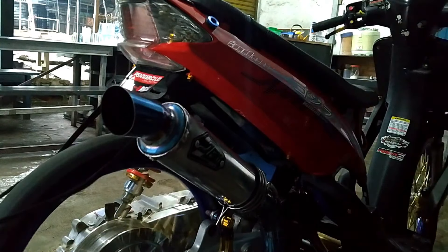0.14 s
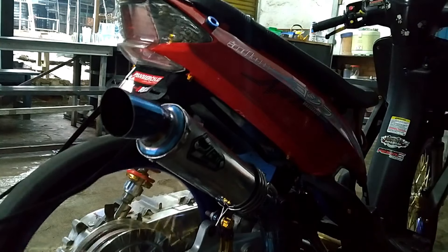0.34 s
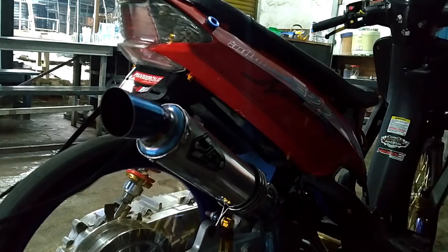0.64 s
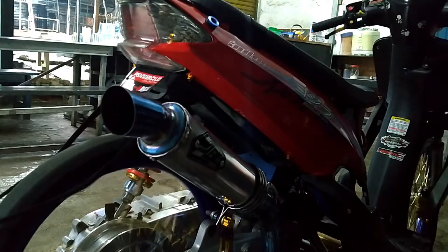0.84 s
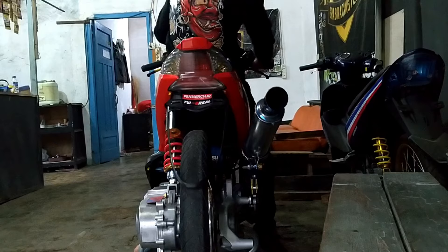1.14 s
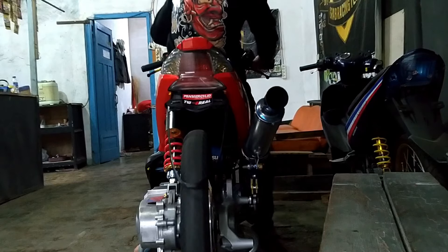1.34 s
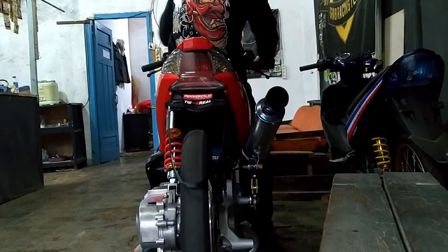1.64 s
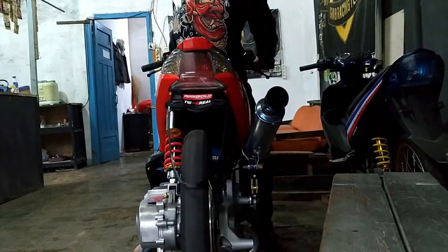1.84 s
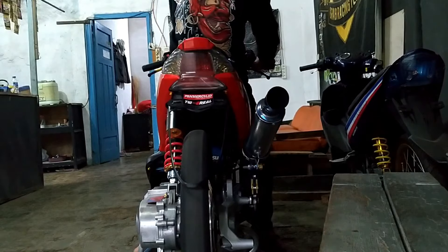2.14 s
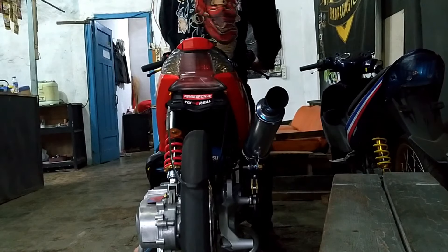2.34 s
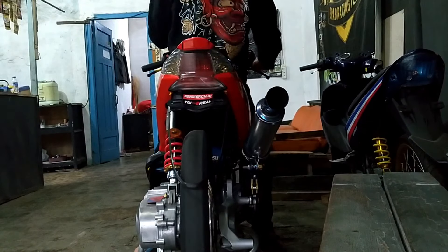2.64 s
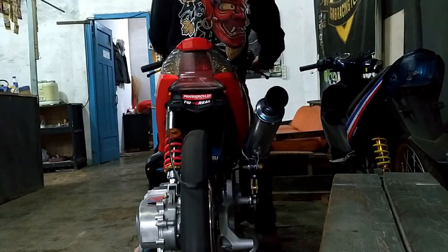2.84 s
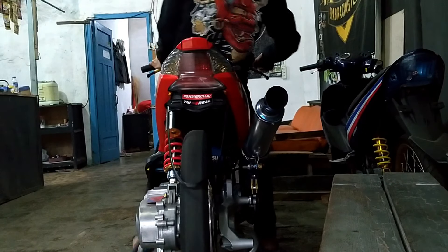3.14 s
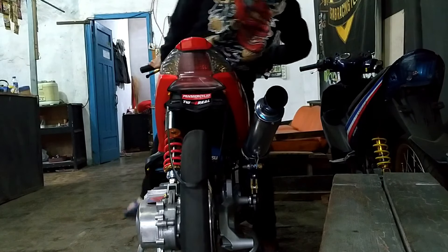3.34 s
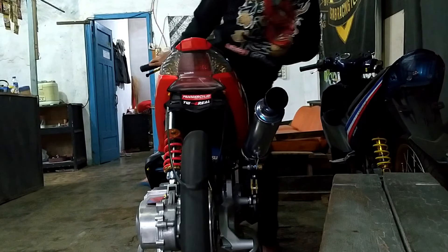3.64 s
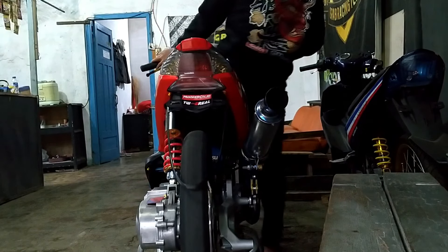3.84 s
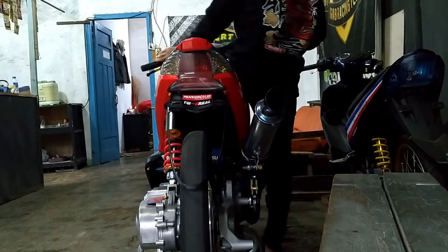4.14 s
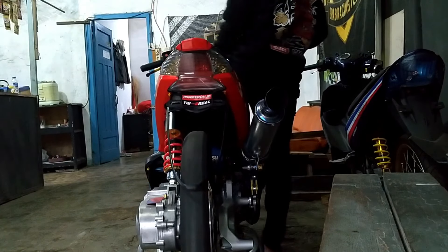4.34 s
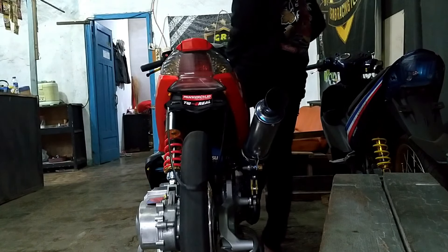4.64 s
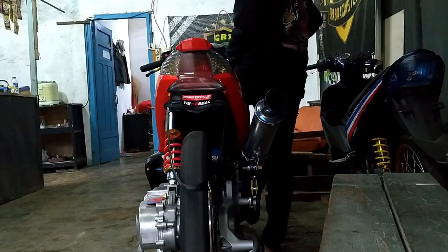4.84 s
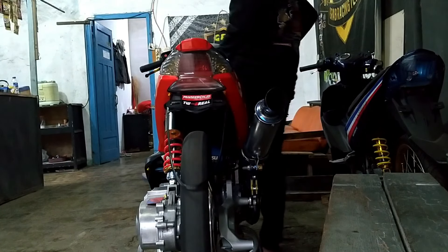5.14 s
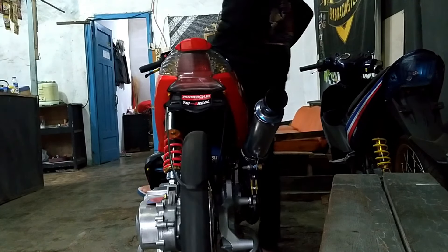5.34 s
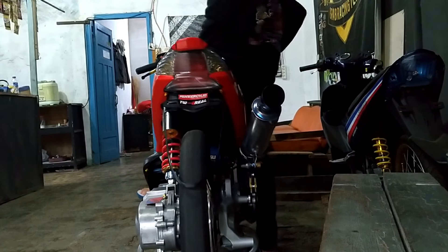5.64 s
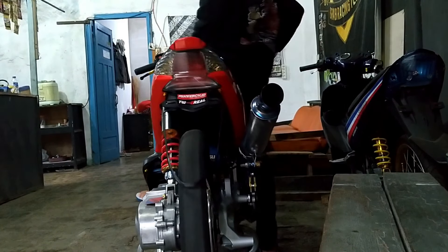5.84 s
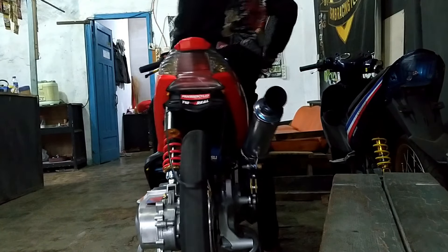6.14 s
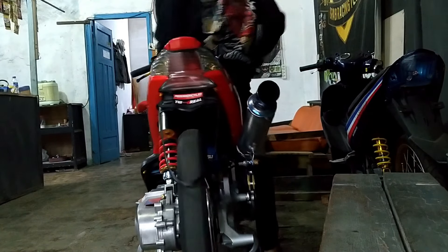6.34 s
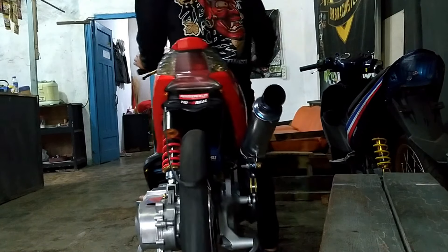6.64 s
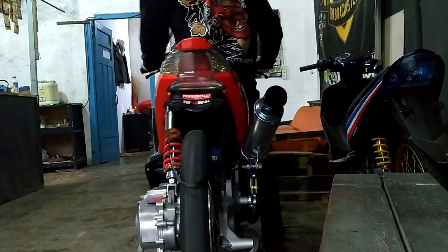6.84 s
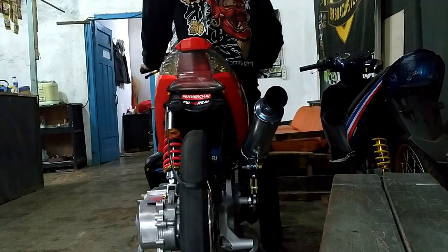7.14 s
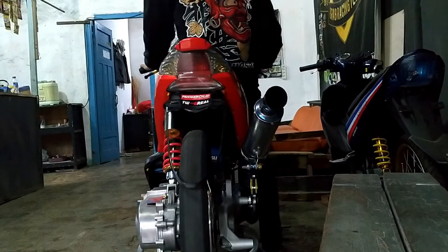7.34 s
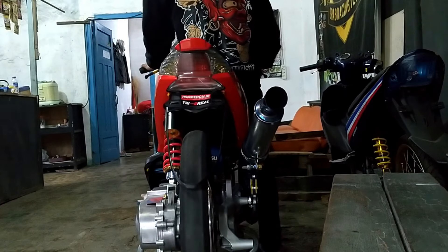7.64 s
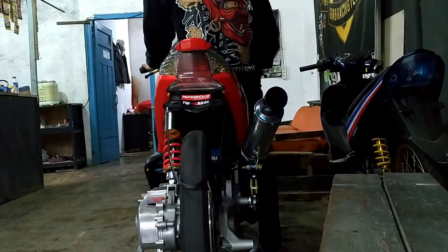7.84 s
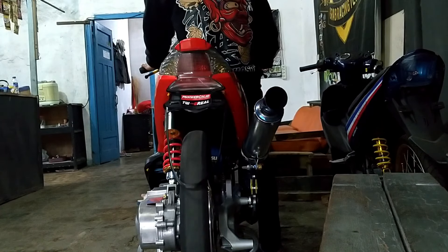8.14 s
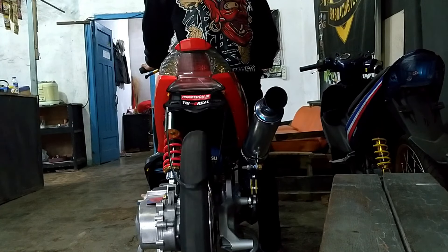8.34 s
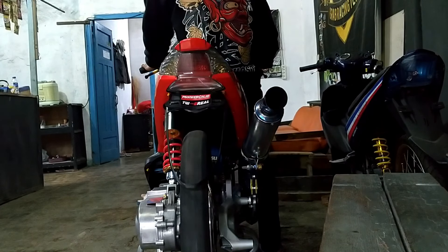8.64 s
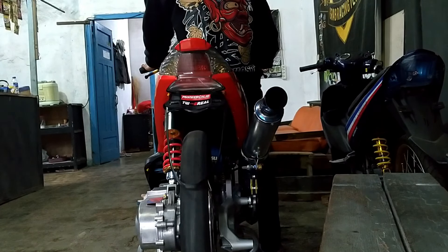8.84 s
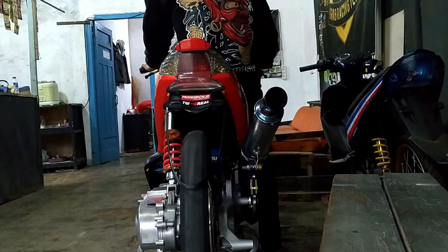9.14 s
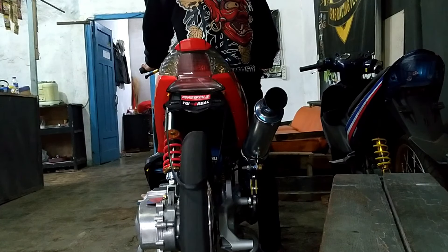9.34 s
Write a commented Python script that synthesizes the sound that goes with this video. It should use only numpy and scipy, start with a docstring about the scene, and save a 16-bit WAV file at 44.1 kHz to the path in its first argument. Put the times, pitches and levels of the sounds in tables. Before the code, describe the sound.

A single-cylinder motorcycle revs with sharp exhaust pops, then settles into a long, lumpy idle before starting to rev again.

```python
"""In a small workshop a single-cylinder motorcycle runs with an open silencer.
It is heard at the pipe mouth for one rev, then from behind the bike: a blip, a long lumpy idle with pops
and misfires, and the start of another rev. Firing pulses excite resonances of pipe and room; gas jets are
noise gated by the flow; valves, drive and steel shell add ticks, rattle and pings. A limiter ducks peaks."""
import sys
import numpy as np
from scipy import signal
from scipy.fft import rfft, irfft, next_fast_len
from scipy.io import wavfile
from scipy.ndimage import uniform_filter1d, minimum_filter1d, map_coordinates

SR = 44100
rng = np.random.default_rng(int(sys.argv[2]) if len(sys.argv) > 2 else 0)


def inscribe(sig):
    """Save sig as 16-bit PCM at rate SR to the path in sys.argv[1].

    A 1-D sig is mono; a 2-D sig holds one channel per row.
    Samples are clipped to [-1, 1] before scaling.
    """
    pcm = np.round(np.clip(np.atleast_2d(sig).T, -1, 1) * 32767)
    wavfile.write(sys.argv[1], SR, pcm.astype(np.int16))


N = 418068

MOVE_S = 1.08  # the listening place changes from the pipe mouth to behind the bike
IDLE_RATE = 15.2  # firings per s


def amp(db):
    """Decibel law: level to amplitude gain."""
    return 10 ** (np.asarray(db) / 20)


def unit(x):
    """Normalization: x at rms 1."""
    return x / np.sqrt(np.mean(x ** 2) + 1e-20)


def along(points, hz):
    """Logarithmic frequency scale: interpolates (Hz, value) points."""
    f, v = np.transpose(points)
    return np.interp(np.log(hz + 1), np.log(f + 1), v)


def curves(rows):
    """Linear interpolation in time: one value per sample for each column after the time."""
    s, *cols = np.transpose(rows)
    return [np.interp(np.arange(N) / SR, s, c) for c in cols]


def filtered(x, response):
    """Linear filtering: the spectrum of x times a complex response of frequency."""
    m = next_fast_len(N + SR // 2)
    return irfft(rfft(x, m) * response(np.fft.rfftfreq(m, 1 / SR)), m)[:N]


def coloured(x, spectrum):
    """Spectral shaping: x weighted by (Hz, dB) points."""
    return filtered(x, lambda hz: amp(along(spectrum, hz)))


def ring(x, modes):
    """Modal superposition: parallel resonances of alternating sign, with skirts below and above them."""
    edges = [modes[0][0] * 0.96, modes[-1][0] * 1.47]
    x = signal.sosfilt(signal.butter(2, edges, "band", fs=SR, output="sos"), x)

    def response(f):
        total = 0
        for k, (centre, width, db) in enumerate(modes):
            resonance = 1j * f * width / (centre * centre - f * f + 1j * f * width)
            total = total + (-1) ** k * amp(db) * resonance
        return total

    return filtered(x, response)


def gliding(x, modes, ratio):
    """Time warping: resonances whose frequencies are scaled by a curve (ratio up to 1)."""
    n, clock = np.arange(N), np.cumsum(ratio)
    warped = np.interp(n, clock, x)
    return np.interp(clock, n, ring(warped, modes))


def steady(x, size):
    """Level equalization: divides x by its running rms over about size samples."""
    power = np.abs(uniform_filter1d(uniform_filter1d(x ** 2, size), size))
    return x / np.sqrt(power + 1e-4 * np.mean(x ** 2))


def fade(pulses, life):
    """Exponential decay: each pulse dies away with a time constant of life seconds."""
    return signal.lfilter([1], [1, -np.exp(-1 / (life * SR))], pulses)


# Twists of the throttle. Each row: start of opening in seconds, time to open in seconds,
# start of shutting in seconds, opening from 0 to 1.
TWISTS = [(.025, 0.02, 0.19, 0.16), (0.326, 0.012, 0.67, 0.8), (1.161, 0.074, 1.38, 0.79),
          (9.05, 0.58, 9.7, 0.5)]
RELEASE_S = 0.031  # time constant of the flow after the throttle shuts


def throttle():
    """Flow control: each twist opens the gas flow, holds it and lets it decay exponentially."""
    t = np.arange(N) / SR
    gas = 0
    for opens, rise, shuts, opening in TWISTS:
        gas = gas + opening * np.clip((t - opens) / rise, 0, 1) * np.exp(-np.maximum(t - shuts, 0) / RELEASE_S)
    return gas


def turning(speed):
    """Phase is the integral of frequency: engine cycles done so far."""
    return np.cumsum(curves(speed)[0]) / SR


def loudness(law, speed, base_speed):
    """Power law of source strength: each exhaust layer's dB follows engine speed and throttle."""
    doublings, gas = np.log2(curves(speed)[0] / base_speed), throttle()
    return [db + speed_db * doublings + gas_db * gas for db, speed_db, gas_db in law]


# Misfires, the gaps in the lumpy idle.
# Each row: time in seconds, change in dB of any firing within 0.025 s.
MISFIRES = [(1.915, -7.5), (2.024, -1.5), (2.134, 1), (2.265, -3), (2.392, -4), (2.523, -4), (2.919, -1.5),
            (3.308, -6), (3.429, -4), (3.559, -3.5), (4.004, -1.5), (4.539, -2), (4.672, 1), (5.264, -0.5),
            (5.523, -1), (6.705, -1), (8.562, -2), (8.758, -0.5), (8.96, -6), (9.091, -2.5)]


def firings(cycles, scatter_db, jitter, hard_db):
    """Periodic impulsive source: a pulse per cycle with random size and timing (jitter in cycles)."""
    times = np.flatnonzero(np.diff(np.floor(cycles))) / SR
    chance = rng.standard_normal((len(times), 2))
    # firings near a pop have a fixed strength and no jitter
    hard = np.abs(times[:, None] - np.transpose(POPS)[0]).min(1) < .008
    s, db = np.transpose(MISFIRES)
    lost_db = (np.abs(times[:, None] - s) < .025) @ db
    sizes = amp(np.where(hard, hard_db, scatter_db * chance[:, 0]) + lost_db)
    times = times + jitter * np.gradient(times) * chance[:, 1] * ~hard
    return np.bincount(np.clip(times * SR, 0, N - 1).astype(int), sizes, N)


# Engine speed at the pipe. Each row: time in seconds, firings per second.
NEAR_SPEED = [(0, 39.5), (.13, 36), (.3, 30.8), (.335, 30), (.42, 38.6), (.478, 41.4), (.558, 44.9),
              (.604, 47.2), (.66, 51), (.7, 50), (.75, 47.2), (.8, 45.1), (.88, 42.4), (1.016, 39),
              (1.08, 37)]
NEAR_CRUISE, NEAR_TOP = 40, 51  # middle and top speed of the first rev, firings per s
NEAR_GLIDE = .4  # octaves the bark rises per doubling of speed
# Loudness of boom, bark, blare and rasp. Each row: dB at NEAR_CRUISE, dB per doubling of speed,
# dB added by full throttle.
NEAR_LAW = [(-7, 7, -6), (-9.5, 25.5, 3), (-20, 14.5, 12.5), (-22.5, 13, 8.5)]
# Resonances at the pipe mouth; the bark's frequencies hold at NEAR_TOP.
# Each row: frequency in Hz, width in Hz, relative level in dB.
PIPE_BOOM = [(101.5, 13, -8), (120, 14.7, 0)]
PIPE_BARK = [(196.7, 26, 5), (243.6, 24, -3.5), (283.5, 19, 2.5)]
PIPE_BLARE = [(309, 38, 5.5), (376, 59, 0), (461, 42, 5), (518, 43, 0), (606, 80, -17.5)]
# Colours of the jet, its open-throttle sizzle and the wind buffet.
# Each row: frequency in Hz, relative spectral level in dB.
NEAR_JET = [(300, -15.5), (560, 6.5), (800, 1), (1200, -4.5), (2000, -10.5), (3000, -17), (4200, -28.5),
            (6000, -32), (7800, -26), (8500, -69.5), (16000, -61)]
SIZZLE = [(1500, -14), (3200, 0), (4300, -14), (6000, -11), (7700, -8.5), (8400, -21), (16000, -55)]
BUFFET = [(15, -19), (45, -14), (70, -13), (130, -18), (400, -67)]


def at_the_pipe():
    """Resonance and jet noise: firings ring the pipe, gas hisses with the flow and buffets the microphone."""
    boom_db, bark_db, blare_db, rasp_db = loudness(NEAR_LAW, NEAR_SPEED, NEAR_CRUISE)
    cycles = turning(NEAR_SPEED) + .98
    pulses = firings(cycles, scatter_db=2.4, jitter=0.005, hard_db=1.5)
    gas = throttle()
    # an open throttle tears the gas stream
    torn = pulses + (0.012 + 0.03 * gas) * fade(pulses, life=0.013) * rng.standard_normal(N)
    ratio = (curves(NEAR_SPEED)[0] / NEAR_TOP) ** NEAR_GLIDE
    boom = amp(boom_db) * steady(ring(pulses, PIPE_BOOM), size=1500)
    bark = amp(bark_db) * steady(gliding(torn, PIPE_BARK, ratio), size=1500)
    blare = amp(blare_db) * steady(ring(torn, PIPE_BLARE), size=1500)
    flow = boom + bark + blare
    # the noise swells on every swing of the flow, and just after each firing
    gate = np.abs(steady(flow, size=2200)) ** 1.1 * (1.1 + fade(pulses, life=0.015))
    jet = steady(coloured(gate * rng.standard_normal(N), NEAR_JET), size=1500)
    sizzle = gas ** 2 * steady(coloured(gate * rng.standard_normal(N), SIZZLE), size=1500)
    buffet = unit(coloured(rng.standard_normal(N), BUFFET))
    return flow + amp(rasp_db) * (jet + amp(-12.5) * sizzle) + amp(-27.5) * buffet


# Colour of the whirr. Each row: frequency in Hz, relative spectral level in dB.
CLATTER = [(20, 7), (45, 3.5), (70, -2), (500, 0), (2000, -0.5), (3000, -11.5), (4000, -16.5),
           (5000, -15.5), (6400, -19.5), (8500, -10.5), (10000, -20.5), (12800, -23), (14500, -18),
           (15800, -15)]


def clatter():
    """Stationary random noise: the even whirr of cam chain and gears."""
    return amp(-35.5) * unit(coloured(rng.standard_normal(N), CLATTER))


# Decay of the workshop. Each row: frequency in Hz, reverberation time (60 dB) in seconds.
WORKSHOP = [(200, 0.93), (2000, 0.98), (10000, 0.18)]


def reverb(x):
    """Diffuse reverberation: convolution with noise that decays at each frequency's own rate."""
    hz, t, z = signal.stft(rng.standard_normal(SR // 2), SR, nperseg=256)
    decay = amp(-60 * t / along(WORKSHOP, hz)[:, None])
    tail = signal.istft(z * decay, SR, nperseg=256)[1]
    late = np.pad(tail, (300, 0))  # starts 300 samples after the direct sound
    return signal.fftconvolve(x, late / np.linalg.norm(tail))[:N]


# Colour of the gas away from the pipe mouth.
# Each row: frequency in Hz, relative spectral level in dB.
FAR_JET = [(300, 3), (590, 8), (780, 1), (1000, 0.5), (1350, -6), (2100, -9), (3000, -17), (4000, -25.5),
           (6000, -23), (7800, -21.5), (8600, -51), (16000, -66)]


def crack(bangs):
    """Impulsive radiation: each bang gives a band-limited pressure snap, a short burst and reverberation."""
    bursts = fade(bangs, life=0.0096) * rng.standard_normal(N)
    snaps = signal.sosfilt(signal.butter(2, [450, 1700], "band", fs=SR, output="sos"), bangs)
    cracks = amp(11) * coloured(bursts, FAR_JET) + amp(32) * snaps
    return cracks + 0.5 * reverb(cracks)


# Hard firings. Each row: time in seconds, strength in dB before the crack is shaped.
POPS = [(0.228, -21.5), (0.554, -8), (0.597, -7), (0.621, -7.5), (0.706, -9.5), (0.739, -21), (1.167, -20),
        (1.219, -21.5), (1.264, -9.5), (1.342, -7.5), (1.671, -38), (1.713, -25), (1.817, -20.5),
        (1.966, -26), (2.326, -31), (2.591, -31), (3.111, -30.5), (3.238, -28), (3.366, -25.5),
        (3.493, -27.5), (3.616, -26.5), (3.746, -32), (3.942, -28.5), (4.203, -32), (4.604, -38),
        (4.999, -38), (5.133, -27.5), (5.458, -37), (5.653, -34), (5.912, -31), (6.175, -44), (6.769, -27),
        (7.296, -39), (7.696, -41), (8.17, -32), (8.5, -33), (8.629, -29), (9.027, -33), (9.09, -22.5),
        (9.201, -23.5), (9.251, -20), (9.34, -35), (9.381, -38), (9.417, -27)]


def pops():
    """Impulsive combustion: unburnt fuel cracks in the pipe."""
    s, db = np.transpose(POPS)
    return crack(np.bincount((s * SR).astype(int), amp(db), N))


# Direct sound and reflections from the nearest walls. Each row: delay in seconds, gain.
WALLS = [(0, 1), (.0098, .88), (.0189, .52), (.0349, .33), (.04635, .77)]


def walls(x):
    """Early reflections: delayed, scaled copies of each firing."""
    return sum(gain * np.pad(x, (round(delay * SR), 0))[:N] for delay, gain in WALLS)


def wobble(rate):
    """Slow random modulation: a smooth curve with rate knots a second."""
    return map_coordinates(rng.standard_normal(400), [np.arange(N) * rate / SR], mode="wrap")


def hunting(cycles):
    """Phase alignment: speed shifts a little to put whole cycles between one hard firing and the next."""
    at = np.array([int(s * SR) for s, db in POPS if s > MOVE_S])
    whole = np.cumsum(np.round(np.diff(cycles[at], prepend=0)))
    return cycles + np.interp(np.arange(N), at, whole - cycles[at])


# Colour of an ordinary firing's snap, thinner than a pop. Each row: frequency in Hz, gain in dB.
SNAP_TONE = [(400, -21), (700, -12), (1100, -6), (2100, 6.5), (3500, -15)]
SNAP_DB, SNAP_SCATTER_DB = -45, 2  # strength before shaping, and its random spread


def firing_snaps(pulses, heat):
    """Impulsive radiation: every firing cracks faintly, more strongly at speed."""
    strength_db = SNAP_DB + SNAP_SCATTER_DB * rng.standard_normal(N) + 3.9 * heat
    return coloured(crack(pulses * amp(strength_db)), SNAP_TONE)


# Engine speed heard from behind the bike: a blip, the idle and a last rev.
# Each row: time in seconds, firings per second.
FAR_SPEED = [(1.08, 15.2), (1.16, 17), (1.24, 24), (1.42, 28.6), (1.52, 28.3), (1.69, 24.5), (1.76, 20),
             (1.92, 19.6), (2.1, 16.8), (2.3, 15.2), (9.05, 15.2), (9.12, 16.4), (9.18, 19.2), (9.32, 23.5),
             (9.48, 29)]
FAR_TOP = 30  # firings per s
# Octaves the hot resonances rise per doubling of speed; the share they sink with the throttle shut.
FAR_GLIDE, COOLING = .22, .04
# Loudness of boom, bark, blare and rasp before the rasp's mix. Each row: dB at idle,
# dB per doubling of speed, dB added by full throttle.
FAR_LAW = [(-15.5, 3.5, -5.5), (-11.5, 1, 12), (-25, 12, 11.5), (-29.5, 4.5, 17)]
# The pipe together with the workshop's standing waves.
# Each row: frequency in Hz, width in Hz, relative level in dB.
ROOM_BOOM = [(76, 5.3, -1.6), (106.4, 8.5, 12.2), (122, 35.7, -4.2), (136.2, 5.7, 3.7)]
ROOM_BARK = [(180, 58.6, 10.5), (205, 69.5, 8.6), (226.8, 10.7, 3.3), (251, 18, 2.5)]
ROOM_BLARE = [(270, 4.2, -5.5), (357, 15.5, -4.5), (387, 19, -9), (438.6, 10.8, -1.5), (445.2, 25.8, -5.5),
              (578, 71, -23)]
# The same with the hot, fast gas of a rev, before the frequencies glide.
# Each row: frequency in Hz, width in Hz, relative level in dB.
HOT_BARK = [(200, 26, -8), (244, 27, -6), (268, 22, 0)]
HOT_BLARE = [(312.5, 28, 1.5), (369.4, 21.4, 8), (423.4, 45, 0), (462, 25, -2.5), (538, 24, -6.5),
             (634, 65, -11.5)]
FLUTTER_CYCLES = 0.0041  # size of the random waver in timing
THROB_DB = 0.8  # the middle standing waves swell and sink in level


def behind_the_bike():
    """Room modes and jet noise: firings excite standing waves and leave rasping puffs of gas."""
    boom_db, bark_db, blare_db, rasp_db = loudness(FAR_LAW, FAR_SPEED, IDLE_RATE)
    cycles = hunting(turning(FAR_SPEED) + FLUTTER_CYCLES * wobble(rate=5))
    pulses = firings(cycles, scatter_db=1.1, jitter=.006, hard_db=1.2)
    puffs = fade(pulses, life=0.01) * rng.standard_normal(N)
    echoed = walls(pulses + 0.014 * puffs)
    # hotter gas at speed moves the resonances up
    speed, = curves(FAR_SPEED)
    heat = np.clip((speed - 17) / 6, 0, 1)
    ratio = (speed / FAR_TOP) ** FAR_GLIDE * (1 - COOLING * (1 - throttle()))

    def body(x, cool, hot):
        cool_ring = unit(ring(x, cool))
        hot_ring = unit(gliding(x, hot, ratio))
        return steady((1 - heat) * cool_ring + heat * hot_ring, size=9000)

    boom = amp(boom_db) * steady(ring(pulses + 0.016 * puffs, ROOM_BOOM), size=9000)
    bark = amp(bark_db + THROB_DB * wobble(rate=12)) * body(echoed, ROOM_BARK, HOT_BARK)
    blare = amp(blare_db) * body(echoed + 0.028 * puffs, ROOM_BLARE, HOT_BLARE)
    # at speed the puffs merge into a stream that crackles on every swing of the flow
    stream = np.abs(steady(bark + blare, size=2200)) ** 2.3 * rng.standard_normal(N)
    jet = coloured(puffs + 0.22 * heat * stream, FAR_JET)
    rasp = amp(rasp_db - 2.0) * steady(jet + 0.74 * reverb(jet), size=5800)
    sizzle = amp(rasp_db - 14.5) * throttle() ** 2 * unit(coloured(stream, SIZZLE))
    exhaust = boom + bark + blare + rasp + sizzle
    return exhaust + firing_snaps(pulses, heat) + valves(pulses) + rattle(pulses)


# The loudest ticks. Each row: time in seconds, strength in dB before trim and shaping.
TICKS = [(2.659, -21.5), (3.1156, -25), (3.2425, -28), (3.6182, -31), (3.8775, -32), (5.2026, -28),
         (5.3327, -30), (5.5944, -30), (5.658, -25), (6.1788, -25), (6.3105, -23), (6.3754, -29),
         (6.5091, -30), (6.5735, -30), (6.6423, -21.5), (6.7735, -41), (6.902, -26), (6.967, -26),
         (7.0334, -29), (7.9703, -26), (8.1743, -25), (8.2395, -25), (8.5015, -26), (8.8263, -27)]
# Colour of the ticks. Each row: frequency in Hz, gain in dB.
VALVE = [(2000, -9.5), (4000, -9), (5100, 3), (6300, -5.5), (7300, 1), (7850, 10), (8300, 1.5),
         (16000, -37.5)]
TAP_DB, TAP_SCATTER_DB = -38.5, 3  # an ordinary tap before shaping, and its random spread
REBOUND_S, REBOUND = 0.0065, 0.36  # delay and gain of the softer rebound


def valves(pulses):
    """Impact noise: the valve gear taps after each firing and rebounds; now and then it taps harder."""
    s, db = np.transpose(TICKS)
    tap_sizes = amp(TAP_DB + TAP_SCATTER_DB * rng.standard_normal(N))
    taps = np.roll(pulses > 0, round(0.0039 * SR)) * tap_sizes
    taps = taps + np.bincount((s * SR).astype(int), amp(db - 7.5), N)
    taps = taps + REBOUND * np.roll(taps, round(REBOUND_S * SR))
    ticks = coloured(fade(taps, life=0.0037) * rng.standard_normal(N), VALVE)
    return ticks + 0.45 * reverb(ticks)


# Colour of the drive. Each row: frequency in Hz, relative spectral level in dB.
GEARS = [(1000, -35), (1600, 0.5), (2100, 3.5), (2600, -6.5), (3300, -2.5), (4200, -20), (7000, -22.5),
         (9000, -45)]
GEARS_DB, GEARS_DB_PER_DOUBLING = -46.5, 11.5  # level at idle, and its growth with speed


def rattle(pulses):
    """Amplitude-modulated noise: the drive rattles 0.02 s after each firing, louder with speed."""
    knocks = fade(np.roll(pulses, round(0.02 * SR)) * amp(4.8 * rng.standard_normal(N)), life=0.041)
    level_db = GEARS_DB + GEARS_DB_PER_DOUBLING * np.log2(curves(FAR_SPEED)[0] / IDLE_RATE)
    return amp(level_db) * unit(coloured((0.5 + knocks) * rng.standard_normal(N), GEARS))


# Pings of the silencer's steel shell. Each row: time in seconds, strength in dB added to every mode.
PINGS = [(2.917, -26), (3.114, -34), (3.24, -33), (3.367, -24.5), (3.617, -29), (8.172, -33), (8.63, -32)]
# Modes of the shell. Each row: frequency in Hz, relative level in dB, 60 dB decay time in seconds.
SHELL = [(970, -4, .05), (1650, -1, .06), (1730, -8, .06), (2120, -9, .05)]


def pings():
    """Free vibration: a sharp firing sets the steel shell's damped modes ringing."""
    s, db = np.transpose(PINGS)
    t = np.arange(SR // 4) / SR
    note = sum(amp(level - 60 * t / t60) * np.sin(2 * np.pi * hz * t) for hz, level, t60 in SHELL)
    return signal.fftconvolve(np.bincount((s * SR).astype(int), amp(db), N), note)[:N]


def scene():
    """Superposition: the two listening places cross over in 0.01 s; pops, pings and whirr are added."""
    far = np.clip((np.arange(N) / SR - MOVE_S) / .01 + .5, 0, 1)
    places = (1 - far) * at_the_pipe() + far * behind_the_bike()
    whirr = (0.38 + 0.57 * far) * clatter()
    return (places + pops() + pings() + whirr)[None]


def limiter(x, ceiling_db, recovery_db):
    """Peak limiting: gain falls just in time for a peak and recovers at recovery_db a second."""
    over = np.maximum(20 * np.log10(np.abs(x) + 1e-9) - ceiling_db, 0)
    ramp = recovery_db * np.arange(N) / SR
    held = np.maximum.accumulate(over + ramp) - ramp
    return x * amp(uniform_filter1d(minimum_filter1d(-held, size=120), size=120))


def record(dry):
    """Saturation and band limiting: limits, clips with a dull edge and removes the top of the band."""
    x = limiter(dry[0], ceiling_db=1.0, recovery_db=85.5)
    clipping = np.clip(x, -.96, .96) - x
    x = x + filtered(clipping, lambda hz: hz < 8000)
    return filtered(x, lambda hz: hz < 15900)[None]


dry = scene()
out = record(dry)
inscribe(out)
```